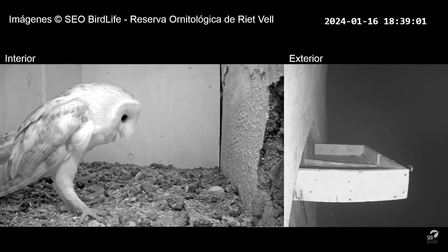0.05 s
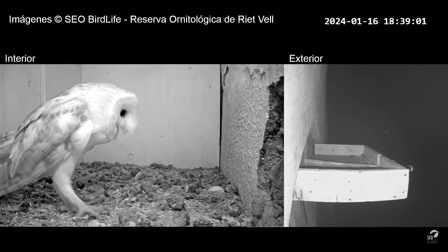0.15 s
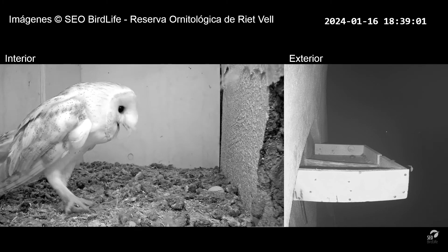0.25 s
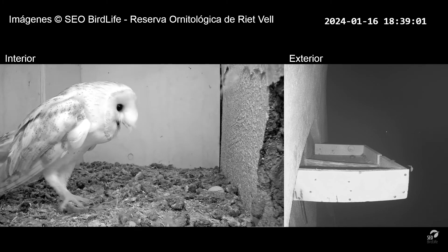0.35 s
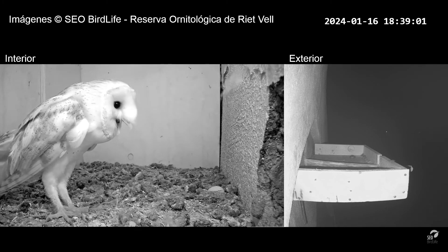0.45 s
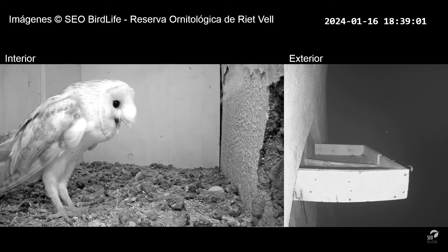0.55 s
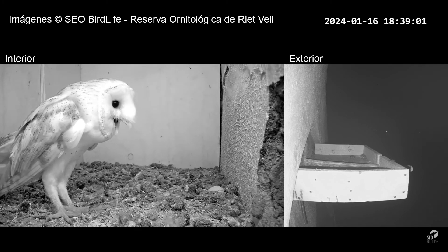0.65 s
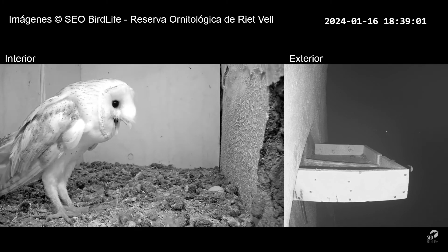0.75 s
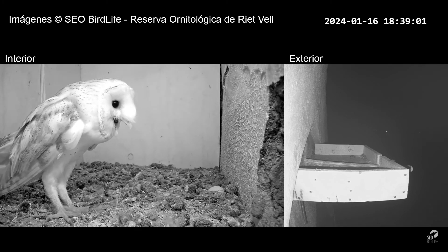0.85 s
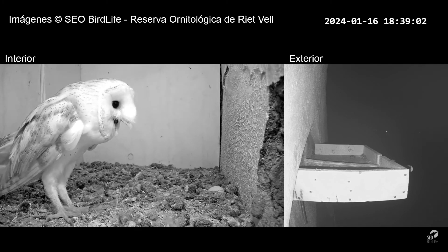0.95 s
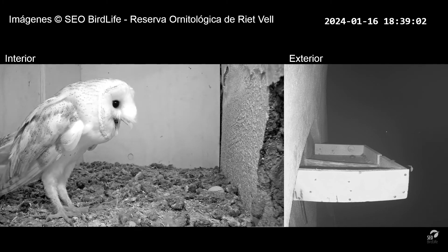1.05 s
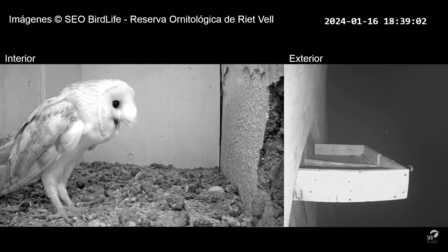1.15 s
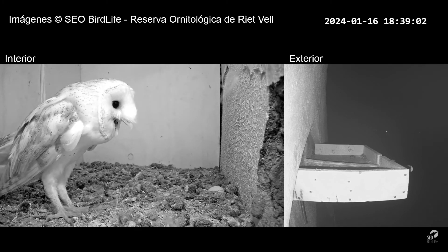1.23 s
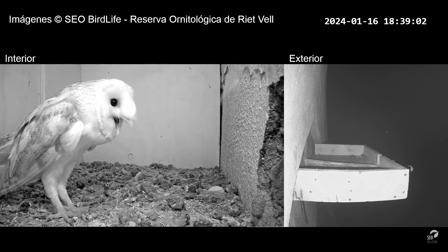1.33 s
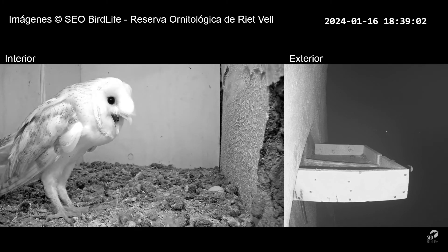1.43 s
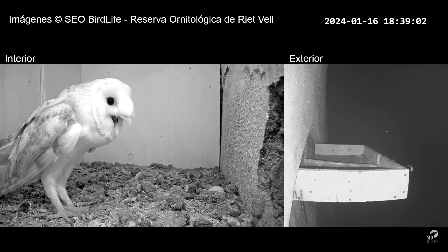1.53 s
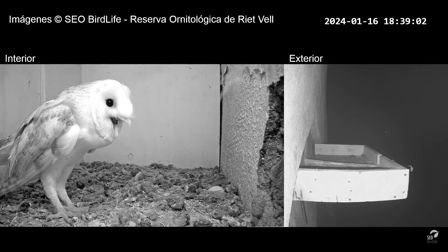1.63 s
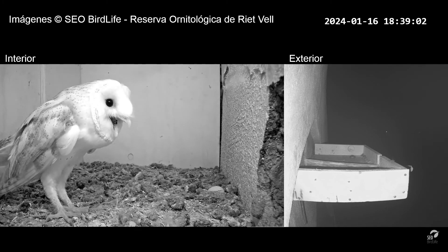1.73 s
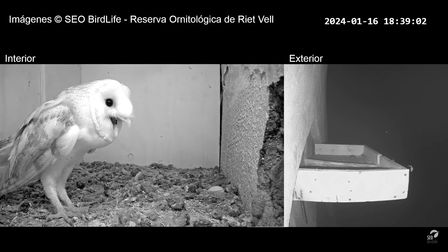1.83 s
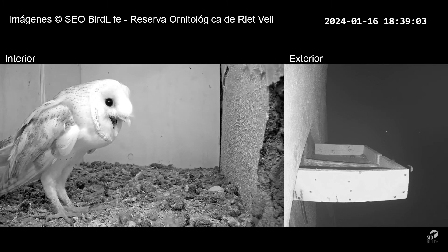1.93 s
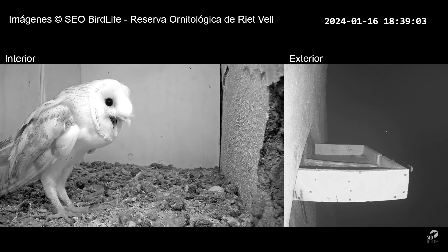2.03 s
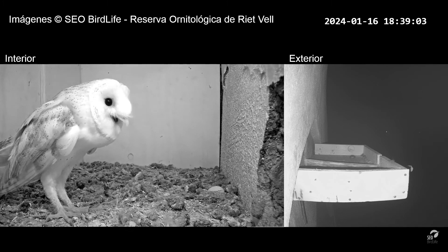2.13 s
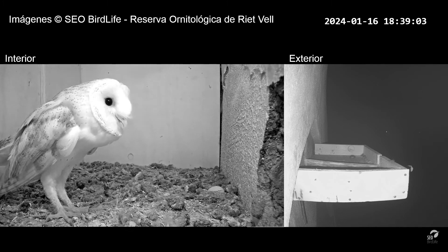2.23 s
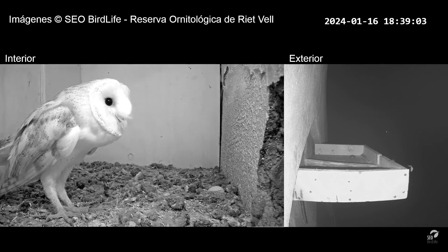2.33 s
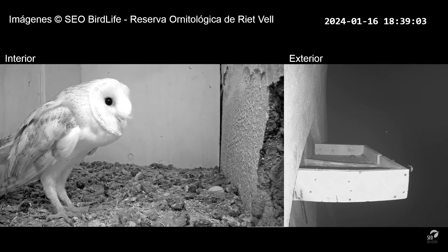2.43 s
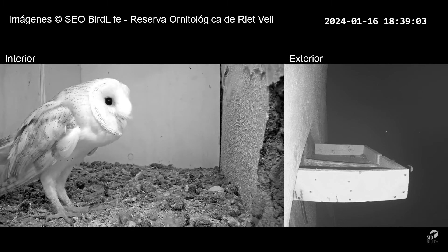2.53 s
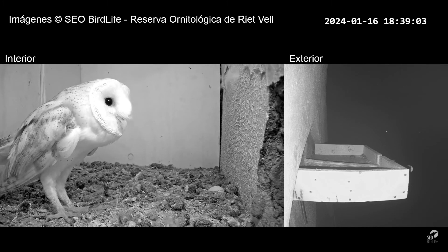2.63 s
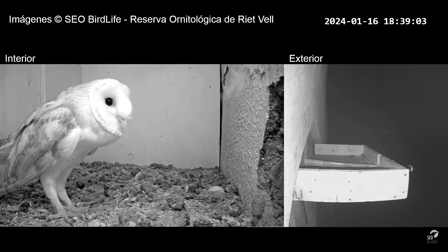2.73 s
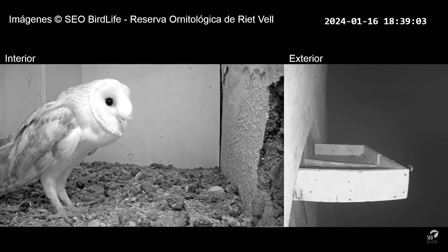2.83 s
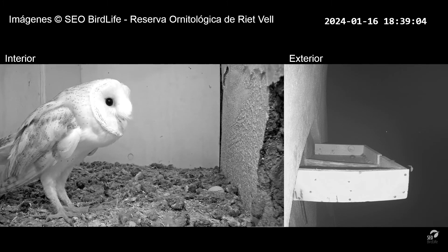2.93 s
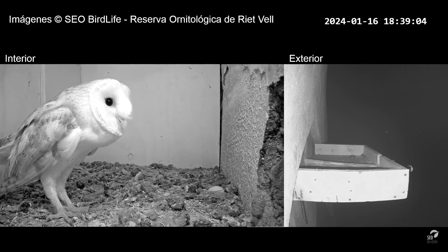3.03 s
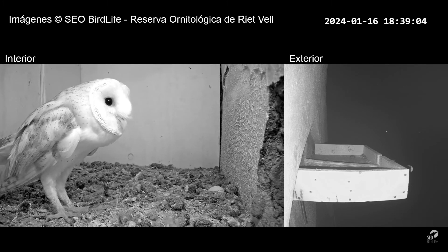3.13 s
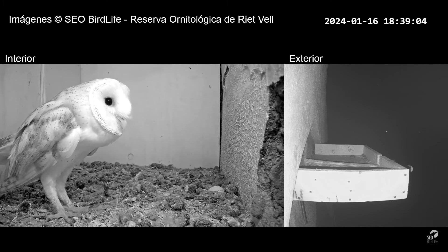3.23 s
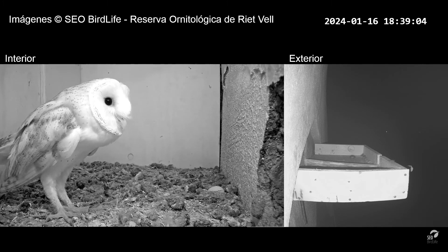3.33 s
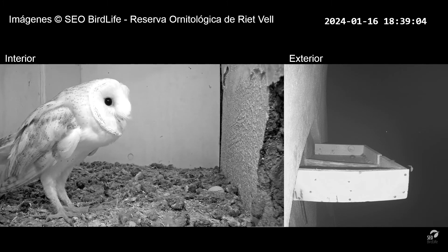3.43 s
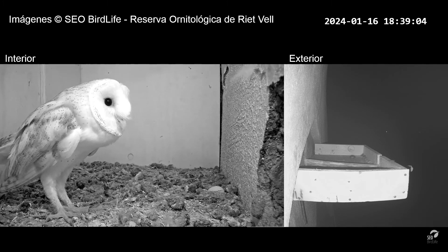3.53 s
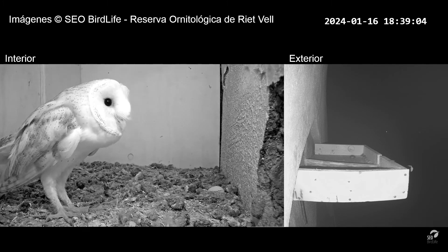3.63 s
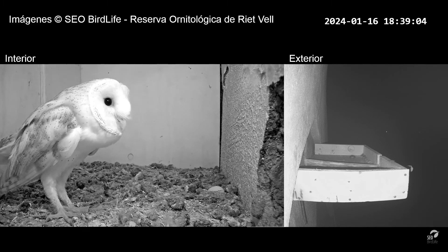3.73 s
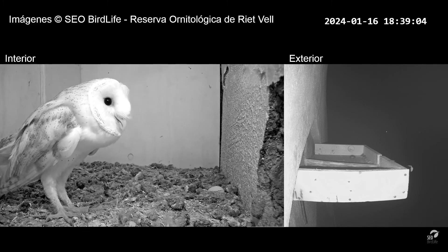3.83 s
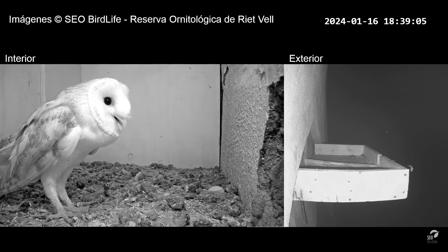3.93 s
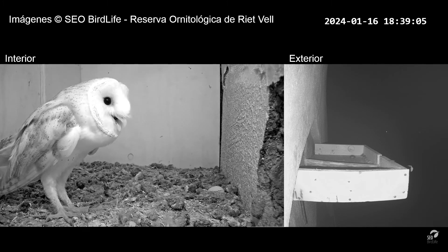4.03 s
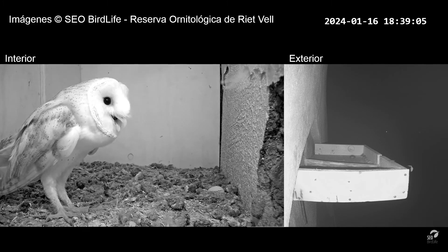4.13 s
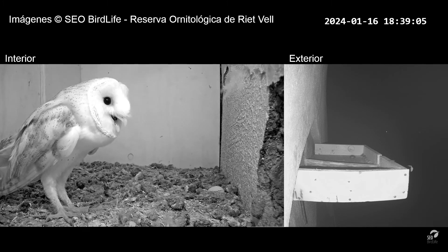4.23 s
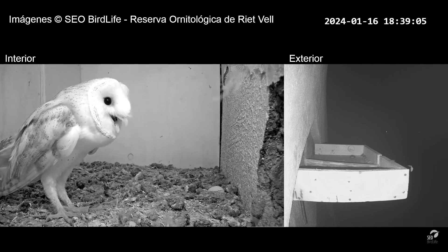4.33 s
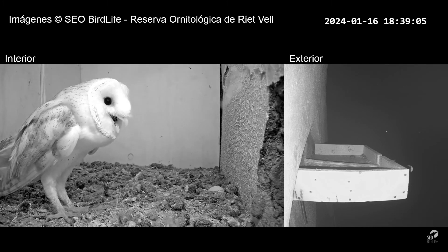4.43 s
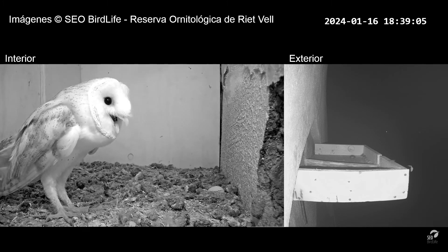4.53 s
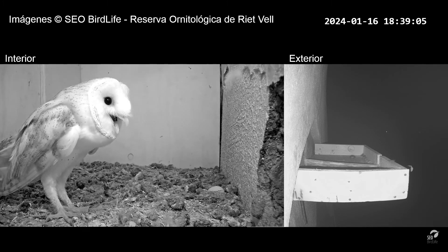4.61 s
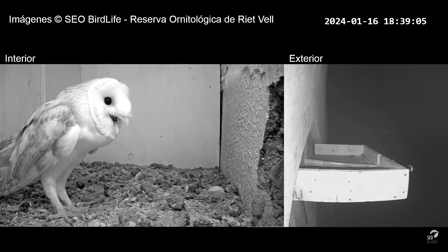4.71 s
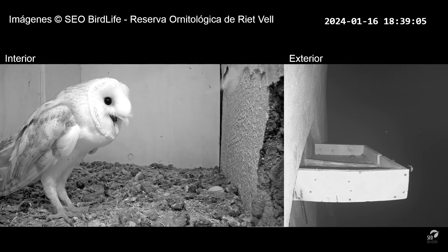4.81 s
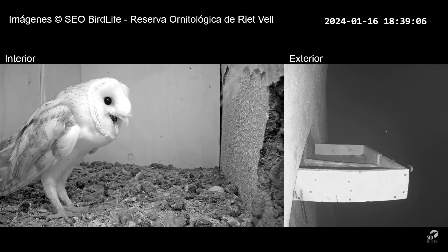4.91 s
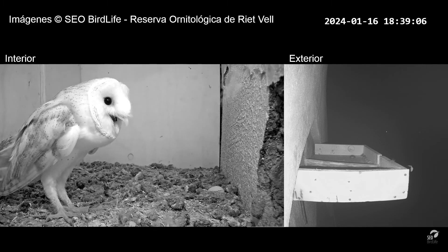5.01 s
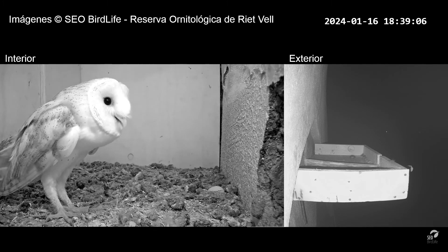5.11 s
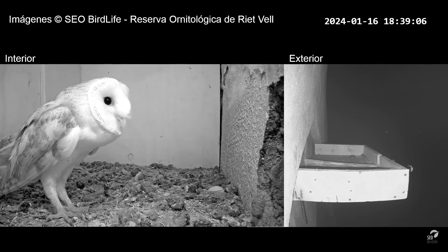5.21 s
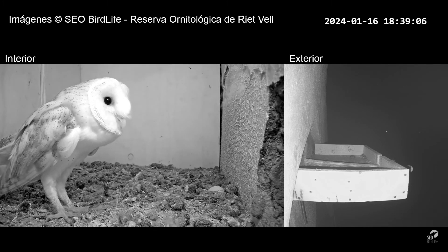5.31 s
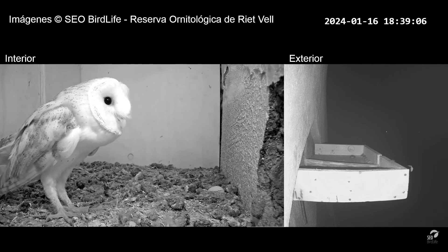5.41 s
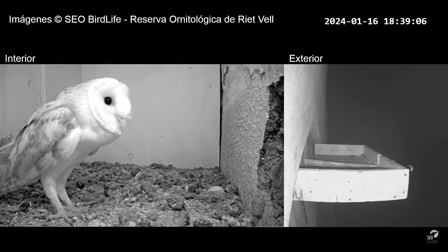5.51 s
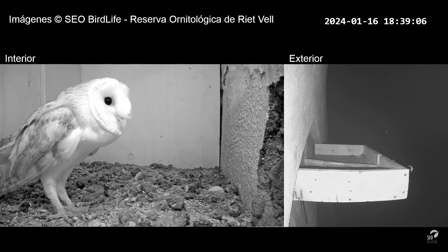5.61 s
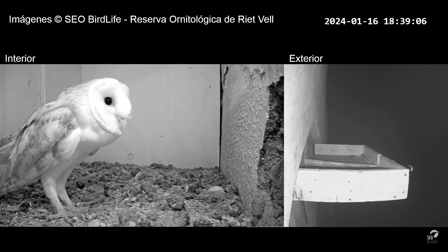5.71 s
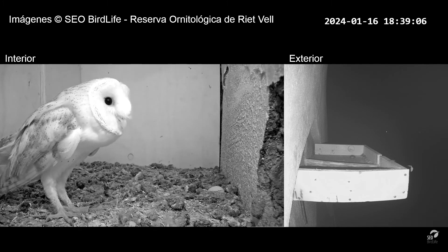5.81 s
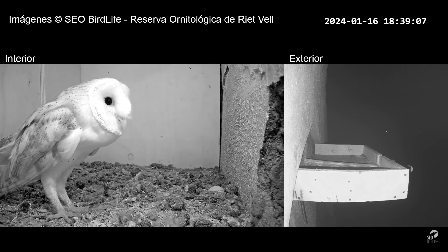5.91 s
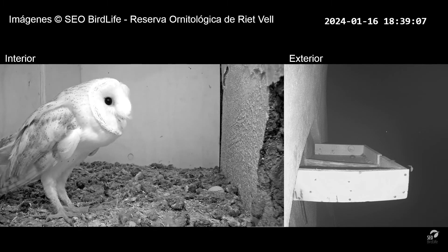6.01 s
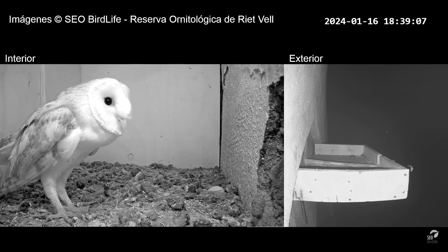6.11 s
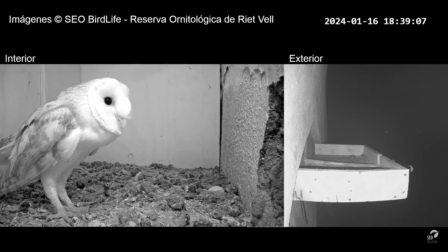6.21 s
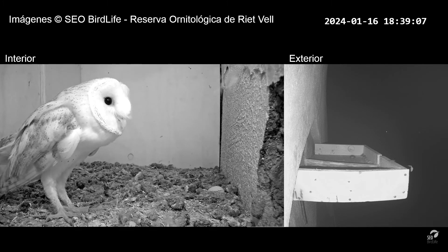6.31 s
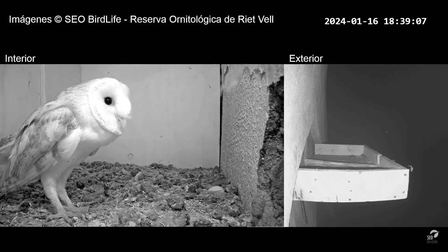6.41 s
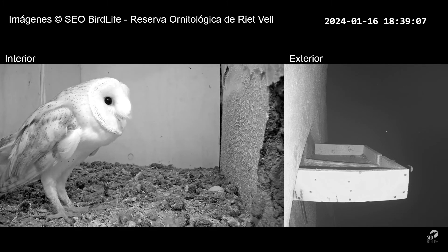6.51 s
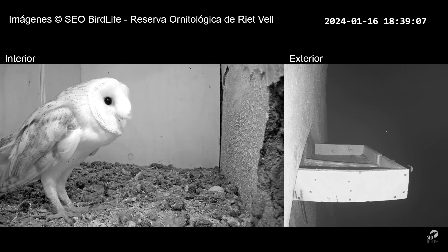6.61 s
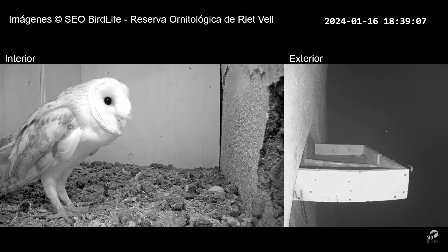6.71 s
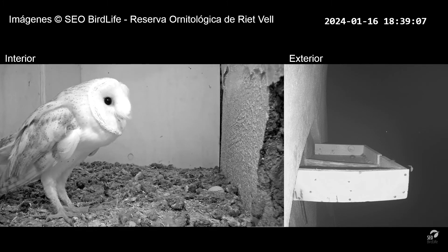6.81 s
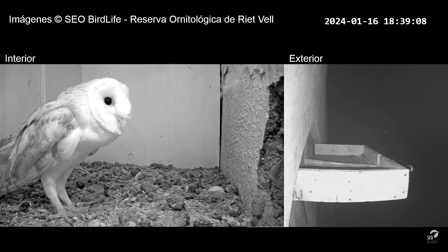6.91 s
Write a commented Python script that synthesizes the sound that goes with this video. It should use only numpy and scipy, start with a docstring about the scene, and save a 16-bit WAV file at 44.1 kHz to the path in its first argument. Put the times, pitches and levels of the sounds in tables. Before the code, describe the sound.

Inside a nest box, a barn owl gives a long, harsh screech that swells, brightens and ends in a short falling squeak. Its foot thumps softly on the floor partway through. After a pause comes a second, shorter screech with a similar squeak at the end. The microphone is very close and overloads slightly at the loudest parts, with a faint electrical hum underneath.

```python
"""A barn owl gives two long, harsh screeches inside a nest box, close to a small camera microphone.
Each is turbulent air, chopped by a rattle and shaped by the throat: it swells, brightens and ends in
a falling squeak. The box colours the voice; a foot knocks on the floor and the beak clicks.
At this range the loudest part overloads the microphone. Mains hum and faint noise lie under it all."""
import sys
import numpy as np
from scipy import signal
from scipy.fft import rfft, irfft, next_fast_len
from scipy.io import wavfile
from scipy.ndimage import uniform_filter1d, map_coordinates

SR = 44100
rng = np.random.default_rng(int(sys.argv[2]) if len(sys.argv) > 2 else 0)


def output_pcm(signal):
    """Save a mono or channel-first signal as 16-bit PCM at the path in sys.argv[1].

    Samples are clipped to [-1, 1] before scaling.
    """
    pcm = np.clip(np.atleast_2d(signal).T, -1, 1) * 32767
    wavfile.write(sys.argv[1], SR, np.round(pcm).astype(np.int16))


N = 306881
TIME = np.arange(N) / SR

# the calls: start/s, end/s, release/s, cry level/dB, rush level/dB, swell time/s,
# lateness factor of the hiss, first throat tuning/Hz, extra rattle at the start/dB
SCREECHES = [(-.03, 2.355, .052, -13.5, -34.5, .64, 1.06, 1755, 0.9),
             (3.865, 5.3, 0.045, -13, -36.5, 0.83, 0.62, 1700, 2)]
# extra pushes of air: t/s, half width/s, pressure/dB
PUSHES = [(.085, 0.018, 3.5), (0.179, 0.032, 0.5), (.88, 0.046, 0.63), (1.78, 0.21, 0.87), (3.925, .015, 4),
          (4.015, 0.018, 1.2), (4.118, .015, 1.8), (4.47, 0.035, 0.3)]
# brief dips, deepest in the treble and the rush: t/s, depth/dB
DIPS = [(.057, 9), (.138, 15.5), (.243, 7), (.425, 8.5), (.96, 7), (3.979, 16), (4.165, 9), (4.375, 6.5),
        (4.789, 8.5)]
# voice bands (main, upper, hiss, top): level/dB, extra growth/(dB per dB of pressure), tired sag/(dB/s)
VOICE_BANDS = [(-0.53, 0.1267, 5), (-4, 1.04, 0.5), (-13.5, 3, 3), (-15, 7.5, 5)]
# share of a dip that each band takes
DIP_SHARES = (.25, .4, .7, .9)
# response of the throat, beak wide open and tuned to OPEN_HZ: f/Hz, level/dB
THROAT_RESPONSE = [(700, -53), (1050, -37), (1300, -18), (1500, -10), (1700, 0), (2150, -2), (2500, -9.5),
                   (2800, -14.5), (3300, -7.5), (3800, -19), (4400, -22.5), (5600, -16.5), (7100, -18.5),
                   (9000, -29.5)]
# air rushing through the open beak: f/Hz, level/dB
RUSH_SPECTRUM = [(150, -24), (270, -19), (340, 3), (405, -9.5), (465, 1.5), (575, -14.5), (675, 7.5),
                 (780, -2.5), (880, -12.5), (1100, -5), (1500, -22.5), (3900, -15.5), (5300, -35.5),
                 (7800, -6)]
# the voice locks into a clear tone: t/s, length/s, first f/Hz, last f/Hz, level/dB
SQUEAKS = [(2.372, 0.026, 1424, 1175, -23.5), (3.884, .034, 2050, 1985, -47.5),
           (5.295, .058, 2002, 1162, -17)]
# harmonics of a squeak before brightening: multiple, level/dB
SQUEAK_HARMONICS = [(1, -4), (2, -6.5), (3, -27), (4, -27)]
# a foot on the floor, a click of the beak: t/s, level/dB, f/Hz, t60/s
KNOCKS = [(.774, -18.5, 73.8, 0.1), (3.871, -37, 1470, 0.029)]
# peaks and notches of the box: f/Hz, width/Hz, level/dB with the head raised at first, then settled, then
# turned
BOX_RESONANCES = [(1244, 170, -4, -3, -6), (1275, 75, 7, 7, 11), (1545, 125, -7.5, -9, -15.5),
                  (1646, 114, 12.5, 6.5, 15.5), (1661.3, 55, -9, -5, -14.5),
                  (1781, 63, -11.5, -13.5, -18.5), (1869, 199, 5.5, 9.5, 14), (1886.5, 55, 3, -10.5, -19),
                  (1984, 97, -11, -6.5, -10), (2113, 36, -5, -9, -11.5), (2285, 96, -5, -11, -4.5),
                  (2321, 376, 8, 12.5, 9), (2395, 105, -19.5, -17.5, -12.5), (2558, 101, 13, -1, -7),
                  (2626, 91, -17, -6, -2), (2858, 89, -19, -10, -10), (3030, 110, -15, -9.5, -18),
                  (3109, 354, 1.5, 11, 13), (3162, 45.6, -6.5, -19, -17.5), (3335, 49, 8.5, -9, -9.5),
                  (3408, 110, -4, 9, 7.5), (3534, 94, -1.5, -20.5, -13.5), (3396, 48, -9.5, -4, -10),
                  (3720, 57, 12, 0.5, -2), (4150, 63, 10, -1.5, -16.5), (4250, 270, 7.5, -5.5, 4),
                  (4577, 250, -6.5, 3.5, 4), (6262, 220, 2.5, 7.5, 11), (6365, 360, 2.5, 3, 0)]
# reflections from the hard walls: delay/s, gain
WALL_ECHOES = [(.00287, 0.19), (.00478, .25), (.0081, .25), (0.0157, .12)]
# one long, faint resonance of the box: f/Hz, t60/s, level/dB
BOX_RING = (1780, .65, -56)
# hum lines, each moved to the nearest mains harmonic: f/Hz, level/dB
HUM_LINES = [(48.4, -42.5), (102.3, -56.5), (150.7, -57), (199.2, -66), (247.6, -65.5), (301.5, -72.5),
             (452.2, -73), (549.1, -72), (651.4, -68), (699.8, -76.5), (748.3, -74.5), (850.6, -76)]
# steady background noise: f/Hz, level/dB
FLOOR_SPECTRUM = [(15, -37), (25, -3), (59, -6.5), (97, -21), (158, -15), (197, -35), (259, -22),
                  (374, -25), (642, -29.5), (906, -30.5), (4590, -36.5), (6810, -42), (8920, -70.5),
                  (11600, -102), (19600, -120)]
# treble roll-off of the microphone: f/Hz, level/dB
MIC_RESPONSE = [(6000, -0.5), (7200, 0), (7550, -14), (7900, -26.5), (8800, -23), (9150, -45)]

OPEN_HZ, BEAK_FULL_HZ, BEAK_SHUT_HZ = 1950, 2001, 1450  # throat tuning: wide open, full pressure, shut
TIRES_AFTER_S, BEAK_SAG_HZ_PER_S = 1.75, 110  # a long screech sags as the bird tires
ONSET_S, DIP_HALF_WIDTH_S = .035, .011  # the air starts to flow in the second half of the onset
RATTLE_HZ, RATTLE_DB = 50, 1.18  # flap rate, and depth at full pressure
HEAD_SETTLE_S, HEAD_TURN_S = (.35, .79), 3.2  # the head settles from its raised start, then turns between the calls
MAINS_HZ, MIC_TOP_HZ = 50, 9200


def screeches(rush_growth):
    """Turbulent air, close up: as pressure builds the beak opens, the rattle eases, the treble rises."""
    current = np.searchsorted([row[0] for row in SCREECHES[1:]], TIME)
    settings = np.array(SCREECHES)[current].T
    start, end, release, level_db, rush_db, swell, lateness, first_hz, extra_rattle_db = settings
    age = np.maximum(TIME - start, 1e-4)
    tired_s = np.maximum(age - TIRES_AFTER_S, 0)
    pressure = 1 - np.exp(-age / swell)
    pressure_db = 20 * np.log10(pressure) + sum(db * bump(s, half_width) for s, half_width, db in PUSHES)
    dip_db = sum(db * bump(s, DIP_HALF_WIDTH_S) for s, db in DIPS)
    shut = np.clip((TIME - end) / release, 0, 1)
    gate = np.clip(2 * age / ONSET_S - 1, 0, 1) * (1 - shut) ** 2
    open_hz = first_hz + (BEAK_FULL_HZ - first_hz) * pressure - BEAK_SAG_HZ_PER_S * tired_s
    beak_hz = (1 - shut) * open_hz + shut * BEAK_SHUT_HZ
    rattle_db = RATTLE_DB + extra_rattle_db * (1 - pressure)
    chop = rattle(rattle_db, scatter=.45, snap=.35, flutter=.3, rasp=.8, rasp_hz=453.4)
    flow = chop * rng.standard_normal(N)
    main, upper, hiss, top = throat(flow, beak_hz, splits_hz=(2312, 4400, 6750))
    bands = zip((main, upper, wall_echoes(hiss), top), VOICE_BANDS, (1, 1, lateness, lateness), DIP_SHARES)
    cry = np.zeros(N)
    for band, (db, growth, sag), late, share in bands:
        swell_db = (1 + late * growth) * pressure_db
        cry += unit(band) * amp(db + swell_db - sag * tired_s - share * dip_db)
    # the rush grows more slowly than the cry and dies with it
    rush = amp(rush_db + rush_growth * pressure_db - dip_db) * chop * noise(RUSH_SPECTRUM)
    return nest_box(gate * (amp(level_db) * cry + rush))


def rattle(depth_db, scatter, snap, flutter, rasp, rasp_hz):
    """Gain of the airflow: short, slightly uneven flaps, a slower flutter and a fine rasp."""
    phase = 2 * np.pi * RATTLE_HZ * TIME + scatter * wobble(25)
    flaps = np.cos(phase) + snap * (np.cos(2 * phase) + np.cos(3 * phase))
    gain = amp(depth_db * (flaps + flutter * wobble(45) + rasp * wobble(rasp_hz)))
    return gain / np.sqrt(uniform_filter1d(gain ** 2, size=1764))  # even power over 40 ms


def throat(flow, beak_hz, splits_hz, size=256):
    """Resonances that move with the beak shape the flow; gives the main, upper, hiss and top bands."""
    frames = dict(fs=SR, nperseg=size, noverlap=size * 3 // 4)
    hz, t, spectrum = signal.stft(flow, **frames)
    tuned_hz = hz[:, None] * OPEN_HZ / np.interp(t, TIME, beak_hz)
    shaped = spectrum * amp(along(THROAT_RESPONSE, tuned_hz))
    main, below_hiss, below_top = (1 / (1 + (tuned_hz / edge) ** 20) for edge in splits_hz)
    shares = main, below_hiss - main, below_top - below_hiss, 1 - below_top
    return [signal.istft(shaped * share, **frames)[1][:N] for share in shares]


def squeaks(jitter, brightening):
    """At low pressure the voice briefly sings a tone, which sags as the air runs out."""
    tone = np.zeros(N)
    unsteady = np.exp(jitter * wobble(550))
    for start, length, first_hz, last_hz, db in SQUEAKS:
        progress = np.clip((TIME - start) / length, 0, 1)
        pitch_hz = (first_hz + (last_hz - first_hz) * progress) * unsteady
        phase = 2 * np.pi * np.cumsum(pitch_hz) / SR
        tilt_db = brightening * (db + 17.5)  # a soft squeak is nearly a pure tone
        wave = sum(amp(level + tilt_db * (k - 1)) * np.sin(k * phase) for k, level in SQUEAK_HARMONICS)
        envelope = np.sin(np.pi * progress ** .65) ** 2
        tone += amp(db) * envelope * unit(wave)
    return tone


def knocks():
    """Foot and beak each set off one quickly damped ring with a soft start."""
    out = np.zeros(N)
    for start, db, hz, t60 in KNOCKS:
        t = np.maximum(TIME - start, 0)
        attack = 1 - np.exp(-hz * t)
        out += attack * amp(db - 60 * t / t60) * np.sin(2 * np.pi * hz * t)
    return out


def nest_box(voice):
    """Standing waves between the walls colour the voice differently at each place of the head."""
    def response_db(hz, place):
        return sum(db[place] / (1 + (2 * (hz - centre) / width) ** 2)
                   for centre, width, *db in BOX_RESONANCES)

    settled = np.interp(TIME, HEAD_SETTLE_S, (0, 1))
    turned = TIME > HEAD_TURN_S
    shares = 1 - settled, settled * ~turned, turned
    return sum(coloured(voice * share, lambda hz: response_db(hz, place))
               for place, share in enumerate(shares))


def wall_echoes(hiss):
    """First reflections from the near walls comb the hiss."""
    return hiss + sum(gain * np.interp(TIME - delay, TIME, hiss, left=0) for delay, gain in WALL_ECHOES)


def box_reverb(voice, t60, wet_db, blur_rad):
    """The box adds a short diffuse tail and one lingering resonance."""
    t = TIME[:SR // 2]
    tail = rng.standard_normal(len(t)) * amp(-60 * t / t60) * (t > .004)
    ring_hz, ring_t60, ring_db = BOX_RING
    ring_phase = 2 * np.pi * ring_hz * t + blur_rad * wobble(200)[:len(t)]
    ring = np.sin(ring_phase) * amp(-60 * t / ring_t60)
    response = amp(wet_db) * tail / np.linalg.norm(tail) + amp(ring_db) * ring / np.linalg.norm(ring)
    return voice + signal.fftconvolve(voice, response)[:N]


def mains_hum(gain_db, waver_db):
    """Harmonics of the mains in the background, wavering a little."""
    level = np.sqrt(2) * amp(gain_db + waver_db * wobble(4))
    lines = np.zeros(N)
    for hz, db in HUM_LINES:
        harmonic_hz = round(hz / MAINS_HZ) * MAINS_HZ
        lines += amp(db) * np.sin(2 * np.pi * (harmonic_hz * TIME + rng.random()))
    return level * lines


def noise(spectrum):
    """Noise of rms 1, coloured by rows of f/Hz, level/dB."""
    return unit(coloured(rng.standard_normal(N), lambda hz: along(spectrum, hz)))


def coloured(x, gain_db):
    """x through the causal filter whose gain is gain_db(hz)."""
    size = 2 * next_fast_len(N // 2 + SR // 4)
    gain = amp(gain_db(np.fft.rfftfreq(size, 1 / SR)))
    cepstrum = irfft(np.log(gain), size)
    cepstrum[1:size // 2] *= 2  # fold onto positive time for minimum phase
    cepstrum[size // 2 + 1:] = 0
    return irfft(rfft(x, size) * np.exp(rfft(cepstrum)), size)[:N]


def along(points, hz):
    """Rows of f/Hz, level/dB, read on a log frequency axis."""
    points_hz, points_db = np.transpose(points)
    return np.interp(np.log(hz + 1), np.log(points_hz + 1), points_db)


def wobble(rate):
    """A smooth random curve of rms 1, with rate knots a second."""
    knots = rng.standard_normal(int(N * rate / SR) + 4)
    return unit(map_coordinates(knots, [TIME * rate]))


def bump(centre_s, half_width):
    """A smooth bell of height 1."""
    return np.exp(-((TIME - centre_s) / half_width) ** 2)


def amp(db):
    """Decibels to gain."""
    return 10 ** (np.asarray(db) / 20)


def unit(x):
    """Scale to rms 1."""
    return x / np.sqrt(np.mean(x ** 2) + 1e-20)


def scene():
    """Inside the nest box: the owl up close, over hum and faint steady noise."""
    voice = screeches(rush_growth=.15) + squeaks(jitter=.018, brightening=.68)
    background = mains_hum(gain_db=.5, waver_db=.35) + amp(-52) * noise(FLOOR_SPECTRUM)
    return (box_reverb(voice, t60=.1, wet_db=-13, blur_rad=2) + knocks() + background)[None]


def record(dry, threshold_db=-9, ceiling=.47, hardness=8):
    """Camera microphone: fast gain control evens the swells, peaks flatten, the treble ends steeply."""
    power = np.abs(uniform_filter1d(uniform_filter1d(dry[0] ** 2, size=400), size=400))
    held = dry[0] / (1 + (power / amp(threshold_db) ** 2) ** 3) ** (1 / 6)
    clipped = held / (1 + np.abs(held / ceiling) ** hardness) ** (1 / hardness)
    dull = coloured(clipped, lambda hz: along(MIC_RESPONSE, hz))
    size = next_fast_len(N + SR // 2)
    passband = np.fft.rfftfreq(size, 1 / SR) < MIC_TOP_HZ
    return irfft(rfft(dull, size) * passband, size)[None, :N]


dry = scene()
out = record(dry)
output_pcm(out)
```